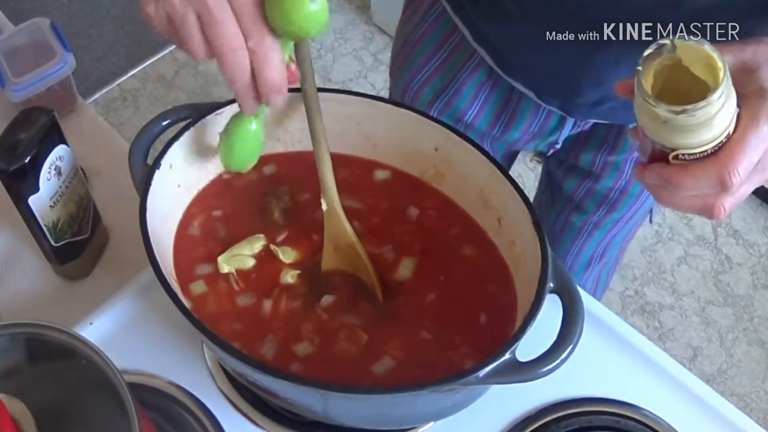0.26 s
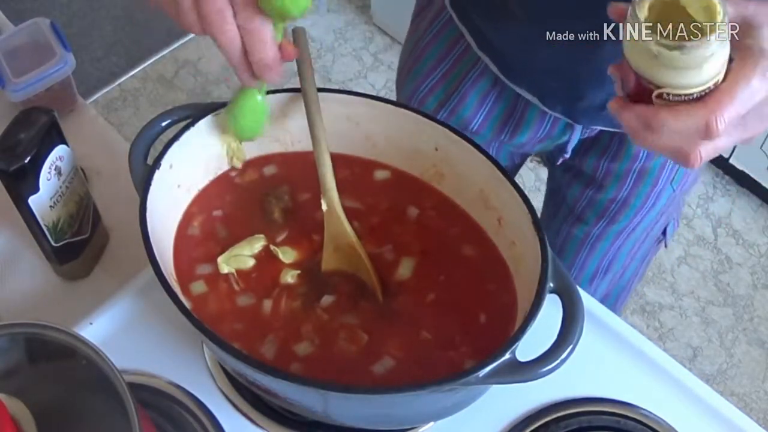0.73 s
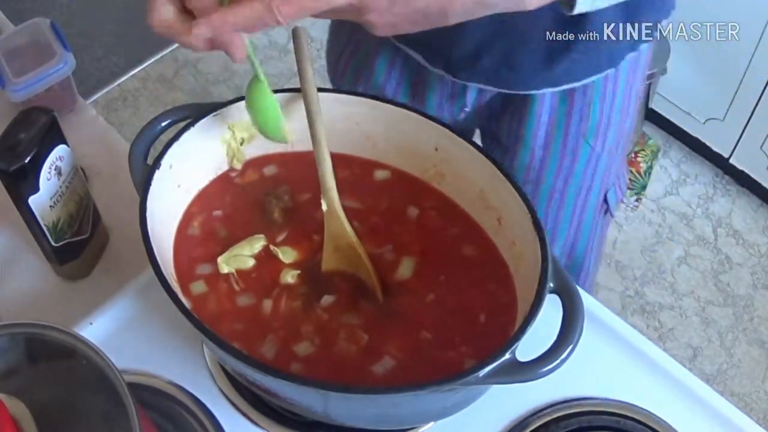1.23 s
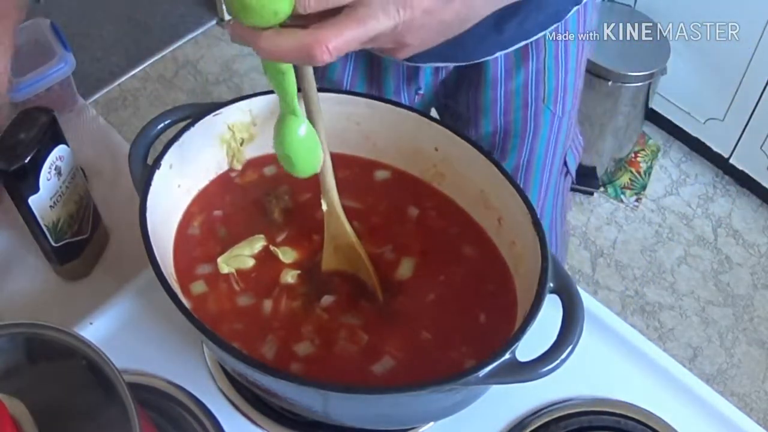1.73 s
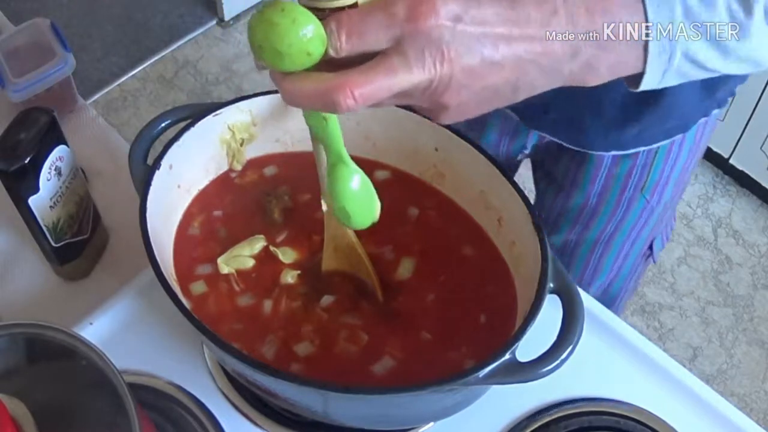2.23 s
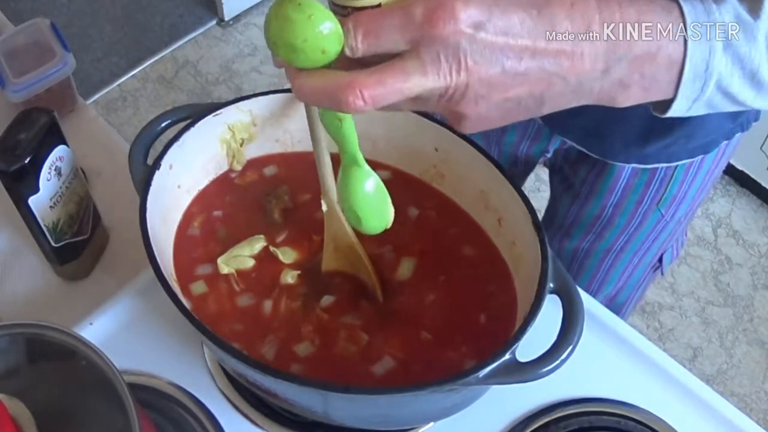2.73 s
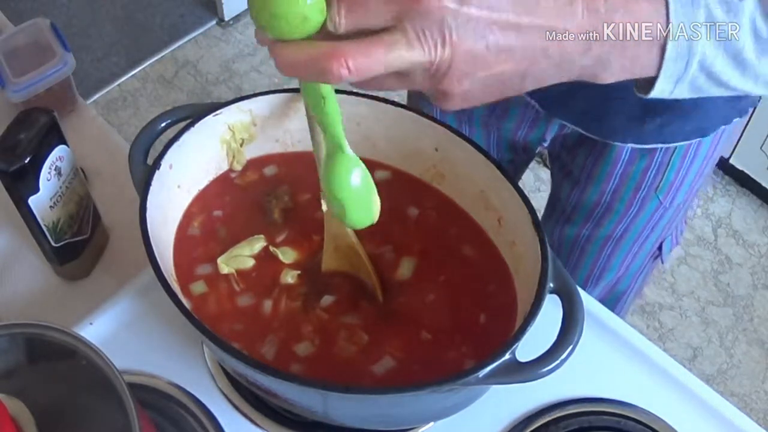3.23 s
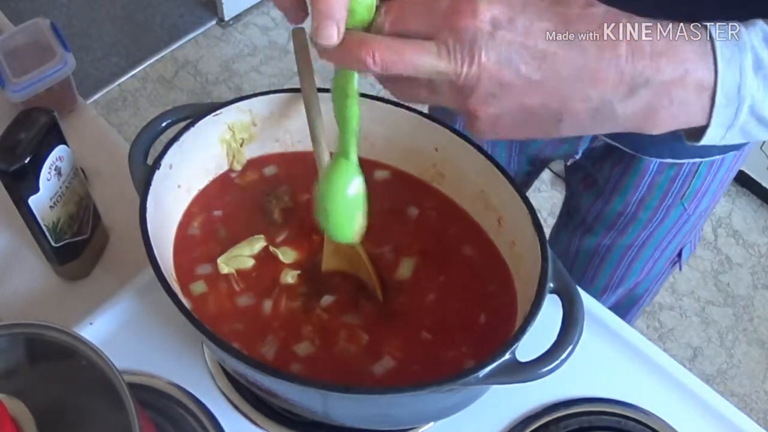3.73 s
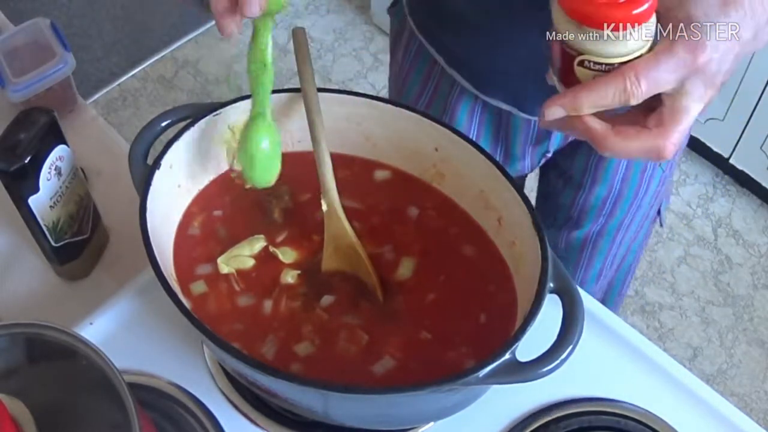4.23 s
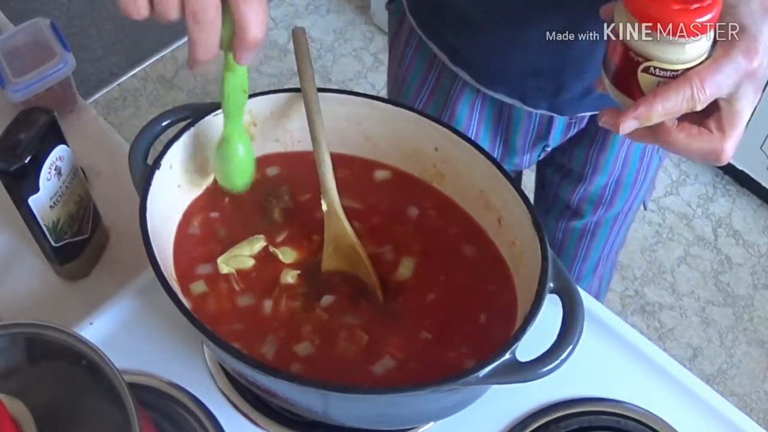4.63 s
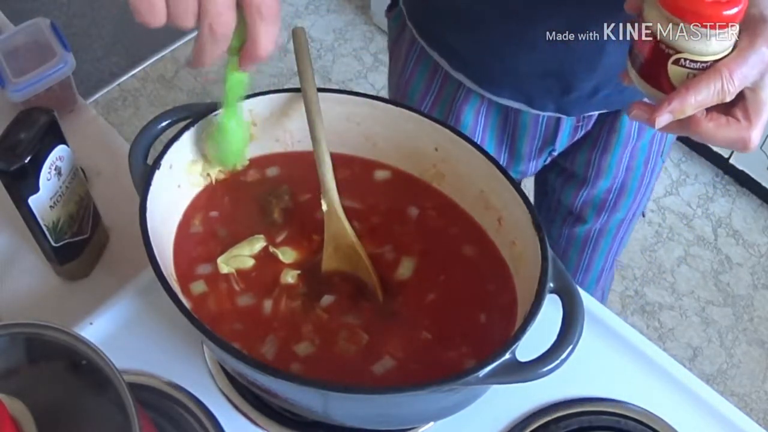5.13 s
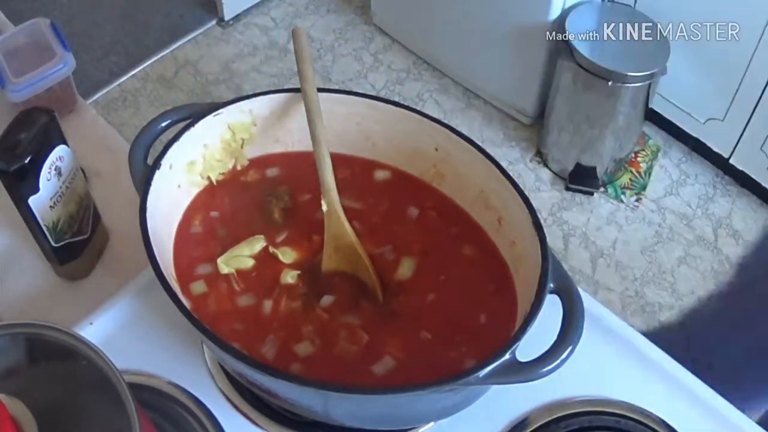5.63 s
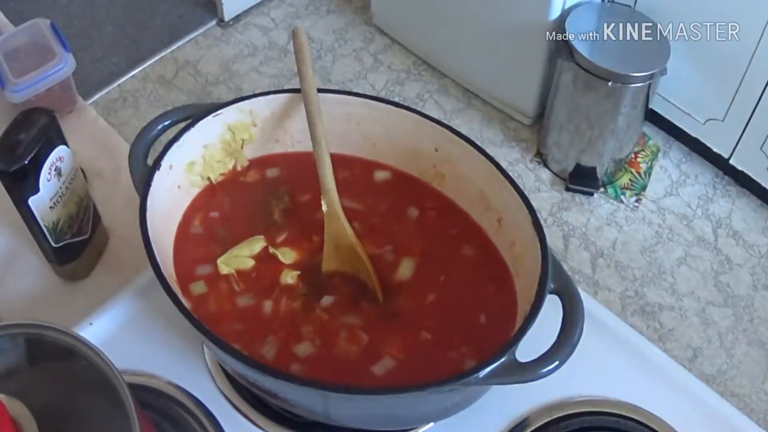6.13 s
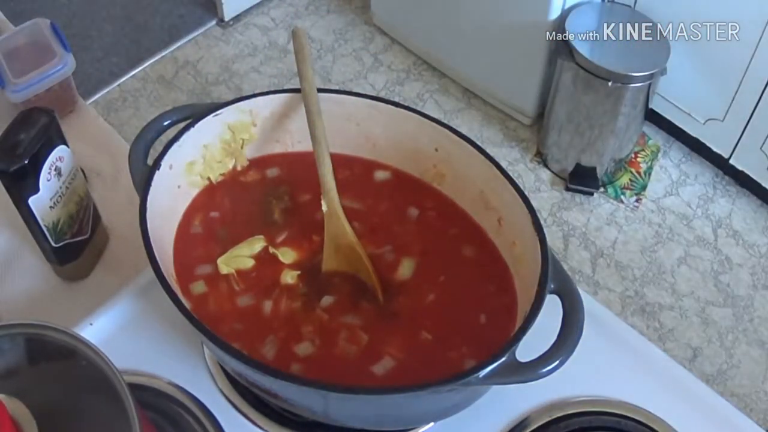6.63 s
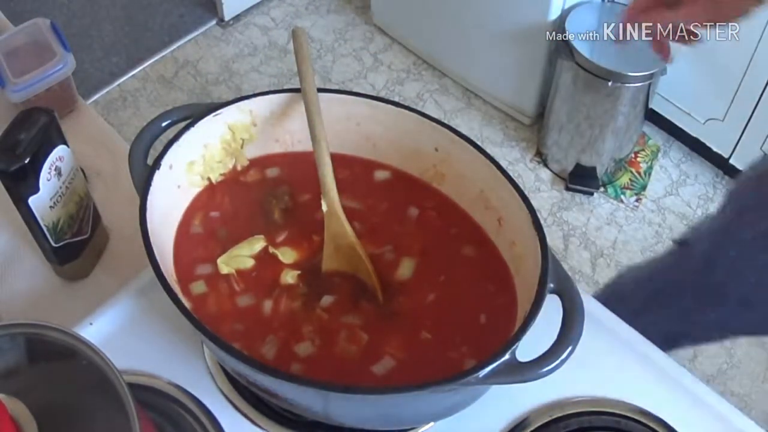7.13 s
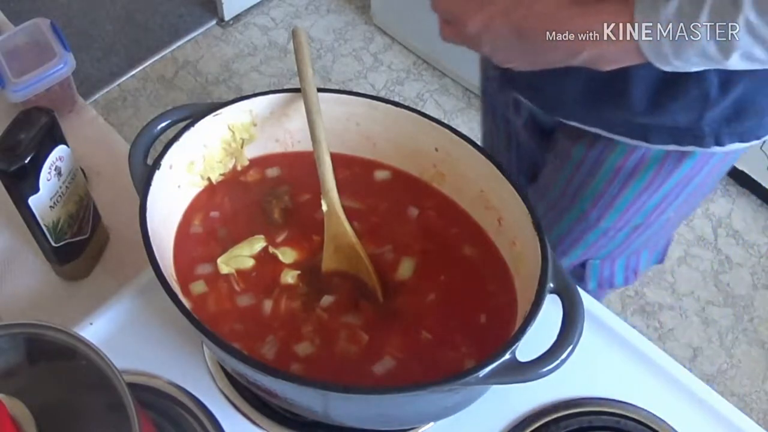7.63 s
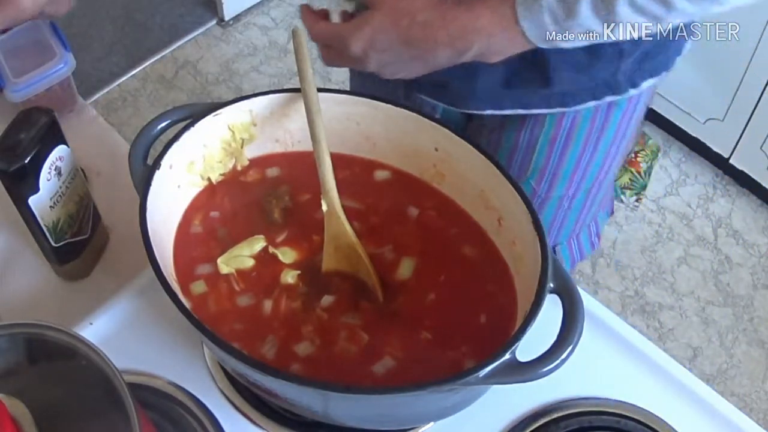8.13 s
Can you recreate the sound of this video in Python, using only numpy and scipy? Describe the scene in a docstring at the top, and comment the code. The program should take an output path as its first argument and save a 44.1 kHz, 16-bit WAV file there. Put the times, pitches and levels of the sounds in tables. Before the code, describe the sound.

A plastic spoon wipes on a full cooking pot, scrapes inside a glass jar, taps the pot rapidly, then things are set down nearby.

```python
"""Spoon, pot and jar in a small kitchen

Close by, a plastic measuring spoon is wiped on the wall of a full cooking pot, scrapes round inside a glass jar
and is tapped clean on the pot; then spoon and jar are put down, a little to the right.
Each contact is a short burst of gritty noise that rings the resonances of the struck thing and a noise-made
kitchen tail. Fingers and sleeves rustle, decaying sines and clicks tick faintly on the stove,
and beneath lie coloured noise for air and hiss and a late low hum.
"""
import sys
import numpy as np
from scipy import signal
from scipy.fft import rfft, irfft, next_fast_len
from scipy.io import wavfile
from scipy.ndimage import uniform_filter1d, map_coordinates

SR = 44100
rng = np.random.default_rng(int(sys.argv[2]) if len(sys.argv) > 2 else 0)


def master(y):
    """Save y as 16-bit WAV."""
    cut = np.clip(np.atleast_2d(y).T, -1, 1)
    pcm = np.round(cut * 32767)  # scale
    wavfile.write(sys.argv[1], SR, pcm.astype(np.int16))


N = 369228  # samples


def amp(db):
    """Decibels to gain."""
    return 10 ** (np.asarray(db) / 20)


def unit(x):
    """Scale to rms 1."""
    return x / np.sqrt(np.mean(x ** 2) + 1e-20)


def along(points, hz):
    """(f/Hz, value) points joined on a log frequency axis."""
    f, value = np.transpose(points)
    return np.interp(np.log(hz + 1), np.log(f + 1), value)


def curves(rows):
    """One value per sample for each column after the time."""
    s, *columns = np.transpose(rows)
    return [np.interp(np.arange(N) / SR, s, column) for column in columns]


def filtered(x, gain):
    """Weight the spectrum of x by a gain that depends on frequency."""
    m = next_fast_len(N + SR // 2)
    spectrum = rfft(x, m) * gain(np.fft.rfftfreq(m, 1 / SR))
    return irfft(spectrum, m)[..., :N]


def causal(db):
    """Minimum-phase response with this gain: it rings only after the blow."""
    cepstrum = irfft(np.log(amp(db)))
    half = len(cepstrum) // 2
    cepstrum[1:half] *= 2
    cepstrum[half + 1:] = 0
    return np.exp(rfft(cepstrum))


def add(track, s, sound):
    """Mix a sound in at time s."""
    start = max(round(s * SR), 0)
    part = track[:, start:start + sound.shape[-1]]
    part += sound[..., :part.shape[-1]]


def spread(pair, side_db):
    """Two unrelated signals as middle and side of a stereo pair."""
    mid, side = pair[0], amp(side_db) * pair[1]
    return np.array([mid + side, mid - side])


def even_noise(envelope, count=3, size=9):
    """Noise under an envelope, total energy 1, shared evenly among the frequencies."""
    x = rng.standard_normal(len(envelope))
    for _ in range(count):
        z = rfft(x * envelope)
        power = uniform_filter1d(np.abs(z) ** 2, size)
        x = irfft(z / np.sqrt(np.abs(power) + 1e-12), len(x))
        x = x * envelope / (envelope ** 2 + 1e-4)  # undo the envelope where it is not tiny
    burst = x * envelope
    return burst / np.linalg.norm(burst)


def room(x, room_db, side_db=-8, gap_s=0.001):
    """The direct sound and a fresh kitchen tail, each frequency dying at its own speed."""
    # Decay of the kitchen (f/Hz, t60/s)
    kitchen_decay = [(100, .3), (380, 0.26), (700, 0.26), (3000, 0.2), (6000, 0.19), (11000, 0.12)]
    hz, t, z = signal.stft(rng.standard_normal((2, SR // 3)), SR, nperseg=256)
    decay = amp(-60 * t / along(kitchen_decay, hz)[:, None])
    tail = signal.istft(z * decay, SR, nperseg=256)[1]
    # the tail rises just after the direct sound
    onset = 1 - np.exp(-(np.arange(tail.shape[1]) / SR / gap_s) ** 4)
    tail = spread(tail * onset, side_db)
    wet = signal.fftconvolve(x[None], tail, axes=1)
    wet *= amp(room_db) * np.linalg.norm(x) / np.linalg.norm(wet.mean(0))
    return wet + np.pad(x, (0, wet.shape[1] - len(x)))


def contacts(rows, colour, modes, gain_db, wet_db, grit_db, rise, left_over_right_db, side_db, dulling_db,
             firm_db=-25, soft_bass_db=0, ring_db=0, ring_width=.06, mode_scatter_db=2.0,
             mode_spacing_hz=220, size=8192):
    """Each contact is gritty noise, a run of tiny slips, that rings the body; row levels are relative."""
    click_s = 0.0063  # contact length at which the treble is left alone
    out, t, hz = np.zeros((2, N)), np.arange(size) / SR, np.fft.rfftfreq(size, 1 / SR)

    def peak(f, width, db):
        """One resonance above the colour, in dB."""
        return db / (1 + (2 * (hz - f) / width) ** 2)

    colour_db = along(colour, hz)
    modes_db = sum(peak(*mode) for mode in modes)
    for s, db, length, *rings in rows:
        length = max(length, .001)
        u = t / length
        pressure = (1 - np.exp(-u / rise)) * np.exp(-u ** 2)
        slips = amp(grit_db * unit(uniform_filter1d(rng.standard_normal(size), size=40)))
        # softer than firm_db, the bass shifts toward soft_bass_db; firmer, the opposite way
        bass_db = soft_bass_db * np.tanh((firm_db - db) / 6)
        # each doubling of the length takes dulling_db off the treble
        treble_db = -dulling_db * np.log2(length / click_s)
        tilt_db = along([(900, bass_db), (1500, 0), (3300, 0.02), (5000, treble_db)], hz)
        # the place of the contact and the grip bring out resonances of their own
        place_db = sum(peak(f, ring_width * f, ring_db) for f in rings)
        body_db = colour_db + np.hypot(modes_db, place_db)
        # the many lesser modes are caught differently each time
        ripple_db = mode_scatter_db * map_coordinates(rng.standard_normal(len(hz)), [hz / mode_spacing_hz])
        burst = even_noise(pressure * slips)
        ring = irfft(rfft(burst) * causal(body_db + tilt_db + ripple_db))
        ring *= np.sqrt(SR / 100) / np.linalg.norm(ring)  # energy of 10 ms at rms 1
        add(out, s, amp(db + gain_db) * room(ring, wet_db, side_db))
    return out * amp([[left_over_right_db / 2], [-left_over_right_db / 2]])


def rebounding(rows, delay_s, drag_s):
    """After each blow the thing comes down again on the same spot and drags."""
    blows = [(s, db, length, *rings) for s, db, length, _, *rings in rows]
    rebounds = [(s + delay_s, db + rebound_db, drag_s, *rings) for s, db, _, rebound_db, *rings in rows]
    return blows + rebounds


def touches(rows):
    """Ahead of each stronger blow the spoon slides softly before it catches hard on the glass."""
    catch_db, lead_s, touch_db = -26.5, .0085, -11  # blow threshold; lead and slide length; slide re blow
    return [(s - lead_s, db + touch_db, lead_s) for s, db, *_ in rows if db > catch_db]


def pot_wipes():
    """The spoon flicks and drags on the pot wall, ringing it at each point of contact."""
    # Blows (t/s, level/dB, contact length/s, rebound re blow/dB, lower f/Hz, upper f/Hz)
    wipe_blows = [(0.1965, -18, 0.0027, -8, 2200, 6300), (0.335, -35, 0.0026, -6, 2134, 2460),
                  (0.404, -33.5, 0.019, -13.5, 1700, 3360), (0.485, -31.5, 0.022, -8, 1450, 3330),
                  (0.5755, -36.5, 0.008, -35, 1360, 3480), (0.612, -38, 0.022, -5, 1400, 3618),
                  (0.7065, -28, 0.0038, -14, 1900, 3730), (0.778, -42.5, 0.022, -13, 2590, 2930),
                  (0.836, -39.5, 0.0029, -25, 1990, 2880)]
    # Broad colour of the full pot (f/Hz, level/dB)
    wipe_colour = [(40, -38), (150, -17), (300, -17), (500, 0.5), (750, -2.5), (1100, -1), (1600, 0.5),
                   (2300, 6), (3200, -3.5), (4500, 5.5), (7000, -6.5), (11000, -6)]
    # Resonances above that colour (f/Hz, width/Hz, level/dB)
    wipe_modes = [(547.6, 11, 17), (1020, 10, 12), (2150, 220, 3), (3370, 280, 17.5), (6570, 460, 8)]
    return contacts(rebounding(wipe_blows, delay_s=0.0098, drag_s=0.041), wipe_colour, wipe_modes,
                    gain_db=-4.0, wet_db=-9.0, grit_db=4, rise=.1, left_over_right_db=-0.4, side_db=-4.5,
                    dulling_db=3.0, firm_db=-30, soft_bass_db=4.5, ring_db=13.5, ring_width=0.063)


def jar_scrapes():
    """The spoon digs in the glass jar: slides, catches and rebounds with broad resonances."""
    # Blows (t/s, level/dB, contact length/s, rebound re blow/dB, lower f/Hz, upper f/Hz)
    jar_blows = [(2.2285, -19.5, 0.0036, -7, 930, 1640), (2.2555, -29.5, 0.003, -15, 1520, 2900),
                 (2.31, -26, 0.0032, -12, 830, 4650), (2.343, -27.5, 0.004, -12.5, 1000, 3900),
                 (2.387, -30.5, 0.0057, -24, 734, 1060), (2.448, -30.5, 0.0072, -3.5, 1400, 3900),
                 (2.733, -42.5, 0.0055, -14, 766, 1610), (2.762, -39.5, 0.01, -3, 240, 406),
                 (2.807, -42.5, 0.011, 0, 490, 1440), (2.851, -35.5, 0.016, -6, 690, 1570),
                 (2.9265, -27, 0.00115, -19, 454, 7730), (3.083, -40, 0.025, 1, 700, 1590),
                 (3.268, -43.5, 0.0028, -27, 770, 3070), (3.2955, -22.5, 0.0044, -29, 2420, 3760),
                 (3.465, -42, 0.0062, -14, 816, 1760)]
    # Broad colour of the jar (f/Hz, level/dB)
    jar_colour = [(40, -38), (150, -27), (300, -19), (500, -4), (750, 4), (1100, 3.5), (1600, -6.5),
                  (2300, -12.5), (3200, -11.5), (4500, -15), (7000, -15), (11000, -21)]
    # Resonances above that colour (f/Hz, width/Hz, level/dB)
    jar_modes = [(840, 114, 4.8), (1440, 92, 4.7), (1680, 100, 9), (3670, 210, 15.3), (4550, 250, 12)]
    rows = rebounding(jar_blows, delay_s=.011, drag_s=0.025) + touches(jar_blows)
    return contacts(rows, jar_colour, jar_modes,
                    gain_db=-5, wet_db=-8, grit_db=2, rise=0.091, left_over_right_db=-0.7, side_db=-6,
                    dulling_db=2.0, firm_db=-25.5, soft_bass_db=-1.5, ring_db=11.5, ring_width=0.24)


def pot_taps():
    """The spoon is knocked clean on the pot; the softer knocks carry more bass."""
    # Blows (t/s, level/dB, contact length/s, rebound re blow/dB, lower f/Hz, upper f/Hz)
    tap_blows = [(4.514, -25.5, 0.0063, -21, 1595, 2000), (4.5975, -27.5, 0.0052, -13, 1770, 5050),
                 (4.6895, -22, 0.0081, -8, 1980, 4980), (4.776, -27, 0.022, -4.5, 2150, 5430),
                 (4.8345, -21.5, 0.0041, -12.5, 3150, 6700), (4.9035, -22.5, 0.0062, -8, 2620, 3600),
                 (4.9775, -26, 0.0033, -22, 2550, 3760), (5.087, -21.5, 0.0045, -3, 2730, 8030),
                 (5.2345, -23, 0.006, 1.5, 2700, 7440)]
    # Broad colour of the tapped pot (f/Hz, level/dB)
    tap_colour = [(40, -34.5), (150, -38.5), (300, -28), (500, -25.5), (750, -24.5), (1100, -5.5),
                  (1600, 1.5), (2300, 2), (3200, -6.5), (4500, -1), (7000, -5), (11000, -16)]
    # Resonances above that colour (f/Hz, width/Hz, level/dB)
    tap_modes = [(693, 150, 13), (1110, 25, 3.3), (2004, 180, 5.2), (2410, 80, 14), (2715, 95, 8.8),
                 (3220, 510, 23.3), (4135, 300, 9.1), (5020, 100, 4.1)]
    return contacts(rebounding(tap_blows, delay_s=0.012, drag_s=.014), tap_colour, tap_modes,
                    gain_db=-1, wet_db=-4.5, grit_db=4, rise=.08, left_over_right_db=-0.5, side_db=-7,
                    dulling_db=2.5, firm_db=-20, soft_bass_db=10, ring_db=13.5, ring_width=0.087)


def spoon_clatter():
    """The spoon is dropped further off: more room to the direct sound, a little to the right."""
    # Blows (t/s, level/dB, contact length/s, rebound re blow/dB, lower f/Hz, upper f/Hz)
    clatter_blows = [(6.1435, -24, 0.02, -10, 298, 2140), (6.1995, -16.5, 0.025, -9.5, 804, 3090),
                     (6.405, -49, 0.022, -19, 1410, 1770)]
    # Broad colour of the clatter (f/Hz, level/dB)
    clatter_colour = [(40, -39), (150, -22), (300, -8.5), (500, -0.5), (750, -8), (1100, 0.5), (1600, 6),
                      (2300, 0), (3200, -4), (4500, -7), (7000, -20.5), (11000, -27)]
    # Resonances above that colour (f/Hz, width/Hz, level/dB)
    clatter_modes = [(298, 24, 7), (762, 73, 13), (915, 60, 10), (990, 24, 13), (1261, 36, 5),
                     (1374, 30, 5), (1496, 29, 5.7), (1655, 30, 5.8), (2067, 76, 8.9), (2444, 160, 7),
                     (3250, 120, 4.7)]
    return contacts(rebounding(clatter_blows, delay_s=0.043, drag_s=0.011), clatter_colour, clatter_modes,
                    gain_db=0.0, wet_db=-2, grit_db=1.0, rise=.1, left_over_right_db=-2.0, side_db=-9.5,
                    dulling_db=-0.2, firm_db=-1.5, soft_bass_db=3.5, ring_db=8.5, ring_width=0.22,
                    mode_scatter_db=1)


def counter_knocks():
    """Things are set down on the counter, to the right: blows with closely spaced lesser modes."""
    # Blows (t/s, level/dB, contact length/s, rebound re blow/dB, lower f/Hz, upper f/Hz)
    knock_blows = [(6.79, -13, 0.027, -3.5, 983, 2800), (7.055, -36.5, 0.019, -7.5, 826, 2300),
                   (8.351, -28.5, 0.023, -10, 422, 1480)]
    # Broad colour of the counter (f/Hz, level/dB)
    counter_colour = [(40, -32), (150, -14.5), (300, -7.5), (500, 2.5), (750, 3.5), (1100, -0.5),
                      (1600, -1.5), (2300, -8), (3200, -10.5), (4500, -8.5), (7000, -17.5), (11000, -37.5)]
    # Resonances above that colour (f/Hz, width/Hz, level/dB)
    counter_modes = [(527, 81, 7), (626, 63, 3.9), (990, 180, 2.33), (1420, 120, 7.4), (1764, 120, 14.2),
                     (2430, 160, 12), (2900, 60, 14), (3880, 120, 14.7), (4960, 110, 9)]
    return contacts(rebounding(knock_blows, delay_s=.021, drag_s=0.031), counter_colour, counter_modes,
                    gain_db=-6.0, wet_db=-11.5, grit_db=1.0, rise=0.046, left_over_right_db=-3.0, side_db=-8,
                    dulling_db=2.5, ring_db=10.5, ring_width=0.26, mode_scatter_db=3.5, mode_spacing_hz=83.3)


def hand_rustle():
    """Fingers and sleeves brush softly: coloured noise without standing resonances or rebounds."""
    # Brushes (t/s, level/dB, length/s)
    brushes = [(1.1945, -56.5, 0.0023), (1.43, -50, 0.022), (1.966, -56.5, 0.011), (2.16, -57, 0.0067),
               (3.712, -53, .0027), (4.215, -52, 0.031), (5.66, -43.5, 0.017), (5.96, -48.5, 0.017),
               (7.69, -48, 0.075), (7.945, -42, 0.03), (8.078, -38, 0.0078), (8.193, -47, 0.074)]
    # Broad colour of skin and cloth (f/Hz, level/dB)
    hand_colour = [(40, -37), (150, -26), (300, -21.5), (500, -6.5), (750, -2), (1100, -2.5), (1600, 2.5),
                   (2300, 1), (3200, -4), (4500, -3), (7000, -7.5), (11000, -15)]
    return contacts(brushes, hand_colour, [], gain_db=-6.0, wet_db=-1.0, grit_db=2, rise=0.13,
                    left_over_right_db=-1.0, side_db=-8.0, dulling_db=-0.4)


def stove_ticking(tick_db=-52.0, scatter_db=3.0, attack_s=0.0023, wet_db=-5, click_db=-9, click_t60=0.029,
                  count=120):
    """A small metal part ticks on at an uneven pace: each time a click and the same few modes."""
    # Modes of the ticking part (f/Hz, level/dB, t60/s)
    tick_modes = [(1769, -5, 0.053), (2580, -6.5, .03), (3580, -6.5, .03), (4810, 3.5, 0.011),
                  (5640, -11, 0.022), (6760, 1, 0.012), (9020, -11.5, .018), (10300, -10, .012)]
    start_s, mean_gap_s, least_gap_s = 2.55, .058, .038
    out, t = np.zeros((1, N)), np.arange(SR // 20) / SR
    hz, level_db, t60 = np.transpose(tick_modes)[:, :, None]
    gaps = least_gap_s + (mean_gap_s - least_gap_s) * rng.gamma(2, .5, count)
    times = start_s + np.cumsum(gaps)
    for s in times[times < N / SR]:
        size, detune, phase = rng.standard_normal((3, len(hz), 1))
        decay = amp(level_db + 2 * size - 60 * t / t60)
        ring = (decay * np.sin(2 * np.pi * (hz * (1 + 0.011 * detune) * t + phase))).sum(0)
        click = amp(click_db - 60 * t / click_t60) * rng.standard_normal(len(t))
        strength = amp(tick_db + scatter_db * rng.standard_normal())
        add(out, s, strength * (ring + 2 * click) * (1 - np.exp(-t / attack_s)))
    return room(out[0], wet_db)[:, :N]


def background(air_db=-4.0, hiss_db=-7.0, hum_hz=84, drift_db=-0.72, drift_rate=6):
    """Soft kitchen air, noise that swells and sinks, with a thin hiss and a low sine hum."""
    # Noise floor, relative (t/s, room murmur level/dB, hiss level/dB)
    floor = [(0, -56.5, -71), (1.35, -63, -76), (1.75, -65.5, -73.5), (2.2, -63, -64.5), (3.7, -58.5, -73),
             (4.3, -63.5, -68.5), (5.5, -61.5, -65), (8.37, -60.5, -62.5)]
    # Colour of the air (f/Hz, level/dB)
    air_colour = [(25, -37.5), (64, -28), (145, -17), (296, -5.5), (450, -5.5), (750, -0.5), (1400, 0),
                  (2200, -5.5), (3200, -11.5), (11000, -23.5)]
    # Colour of the hiss (f/Hz, level/dB)
    hiss_colour = [(1000, -28), (2500, -6.5), (4000, -2.5), (5500, -3.5), (8000, -6), (11000, -6.5)]
    # The low hum sets in (t/s, level/dB)
    hum_level = [(7.35, -110), (7.5, -91), (8.37, -97)]
    murmur_level, hiss_level = curves(floor)
    t = np.arange(N) / SR

    def noise(colour):
        """Wide stereo noise of rms 1 in this colour."""
        white = spread(rng.standard_normal((2, N)), -3)
        return unit(filtered(white, lambda hz: amp(along(colour, hz))))

    # drift_rate random points per second, smoothly joined
    drift = drift_db * map_coordinates(rng.standard_normal(size=200), [t * drift_rate])
    air = amp(murmur_level + air_db + drift) * noise(air_colour)
    hiss = amp(hiss_level + hiss_db) * noise(hiss_colour)
    hum = amp(curves(hum_level)[0]) * np.sin(2 * np.pi * hum_hz * t)
    return air + hiss + hum


def scene():
    """Spoon, pot and jar close by, the putting down off to the right, over ticking and room air."""
    spoon = pot_wipes() + jar_scrapes() + pot_taps()
    putting_down = spoon_clatter() + counter_knocks()
    return spoon + putting_down + hand_rustle() + stove_ticking() + background()


def record(dry):
    """The level dips briefly and returns higher, to stay; a steep band limit takes the top off."""
    # Level over time, the ends held (t/s, level/dB)
    dip = [(.269, -2), (.272, -24), (.284, -27), (.286, 5)]
    top_hz = 11000
    levelled = dry * amp(curves(dip)[0])
    return filtered(levelled, lambda hz: 1 / np.sqrt(1 + (hz / top_hz) ** 120))


dry = scene()
out = record(dry)
master(out)
```